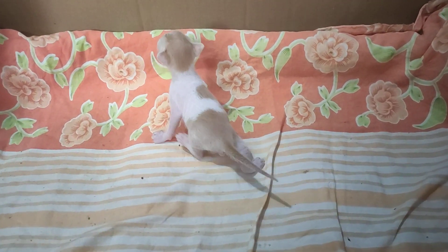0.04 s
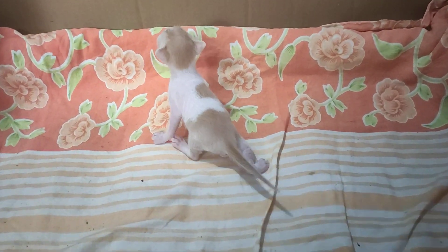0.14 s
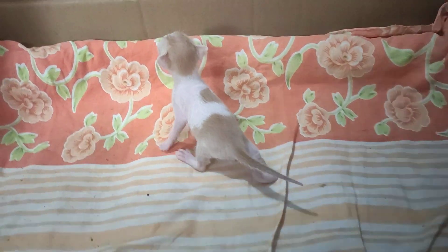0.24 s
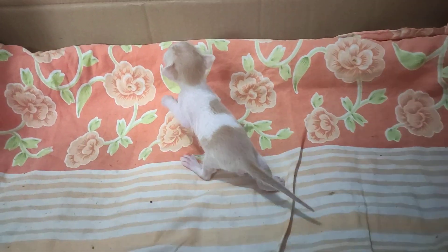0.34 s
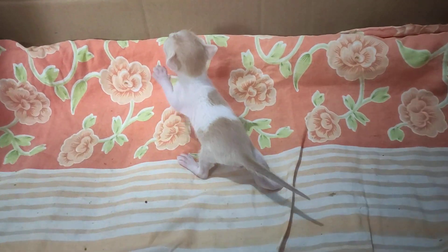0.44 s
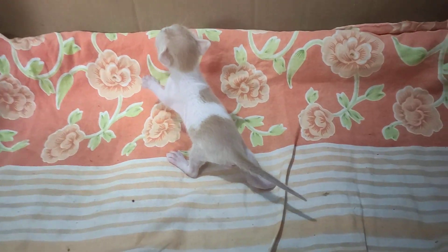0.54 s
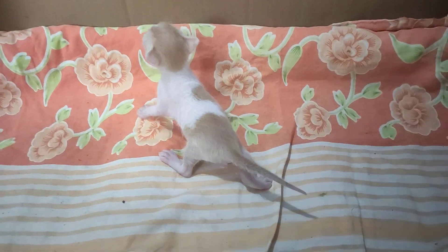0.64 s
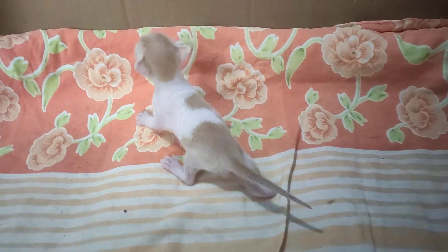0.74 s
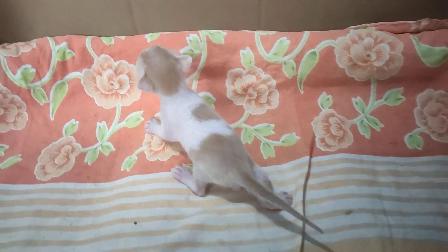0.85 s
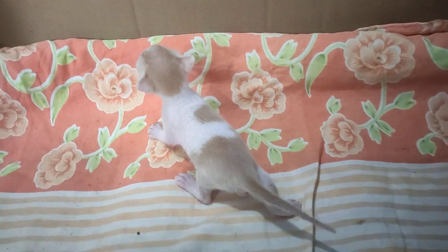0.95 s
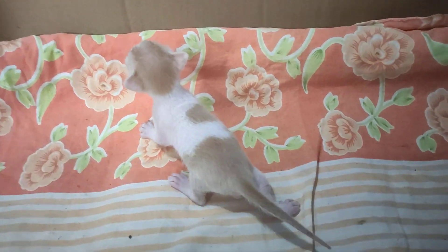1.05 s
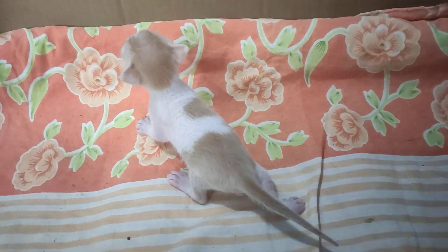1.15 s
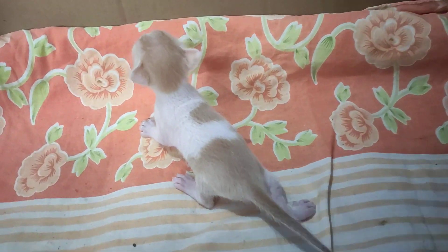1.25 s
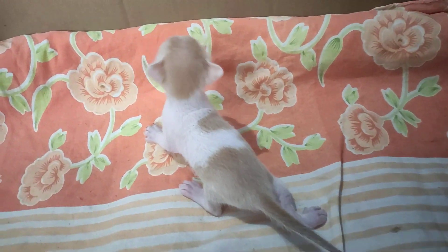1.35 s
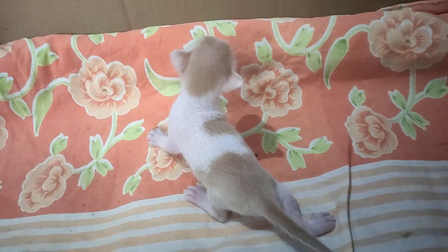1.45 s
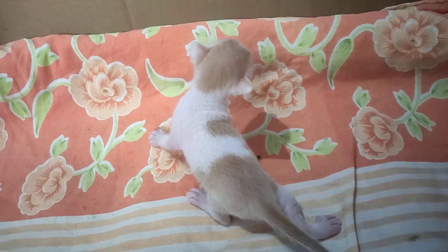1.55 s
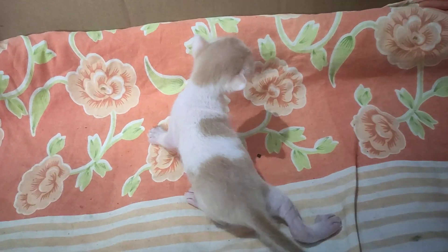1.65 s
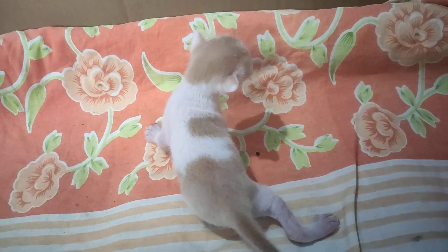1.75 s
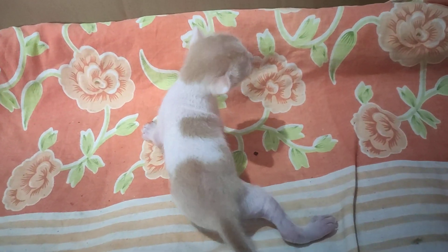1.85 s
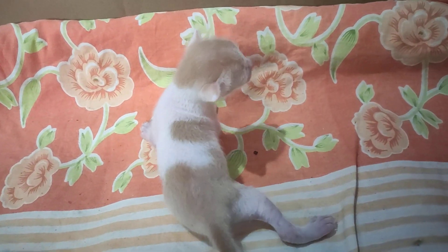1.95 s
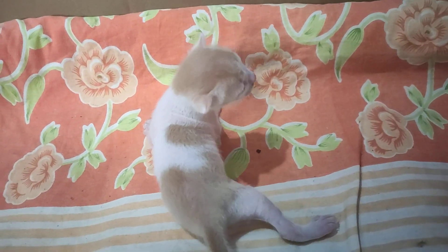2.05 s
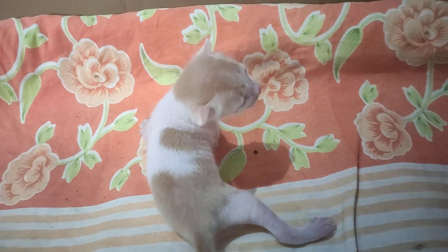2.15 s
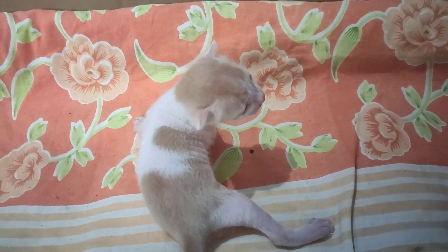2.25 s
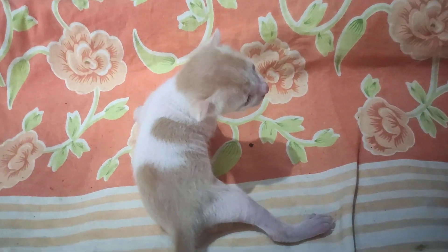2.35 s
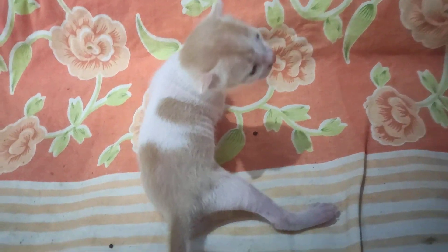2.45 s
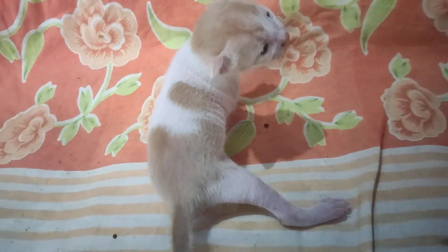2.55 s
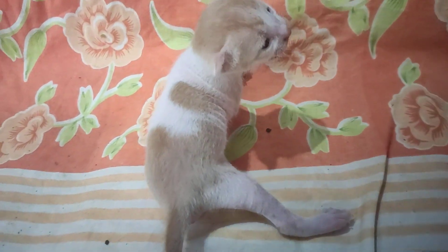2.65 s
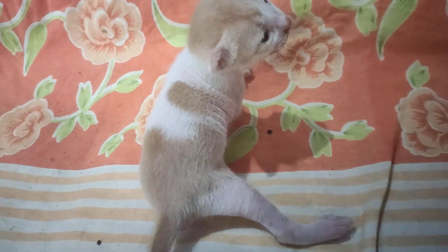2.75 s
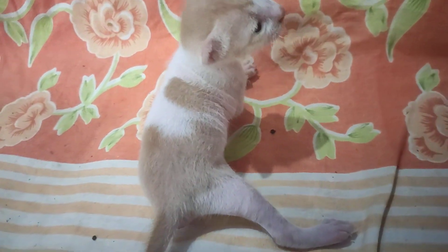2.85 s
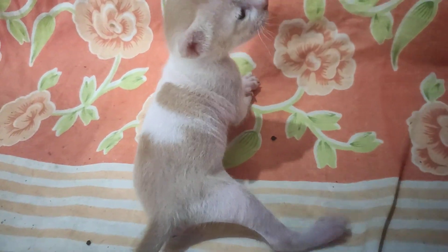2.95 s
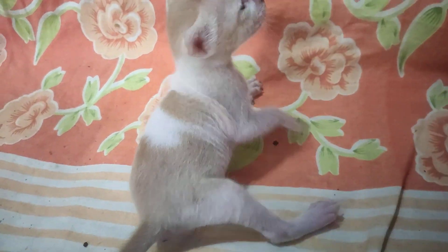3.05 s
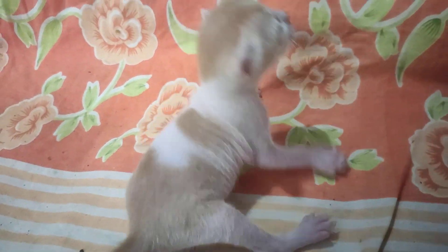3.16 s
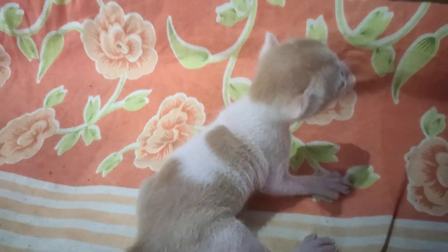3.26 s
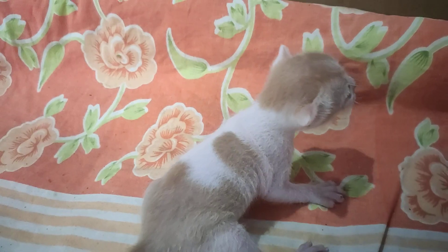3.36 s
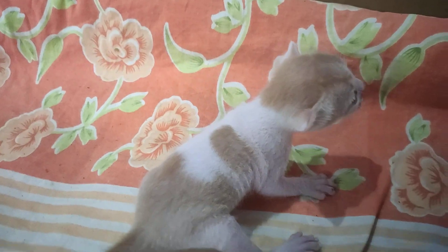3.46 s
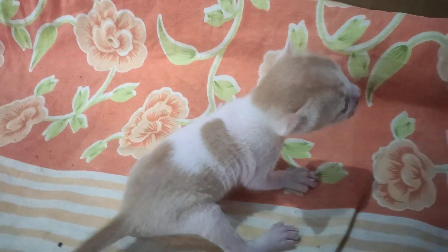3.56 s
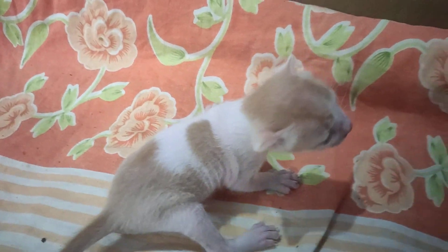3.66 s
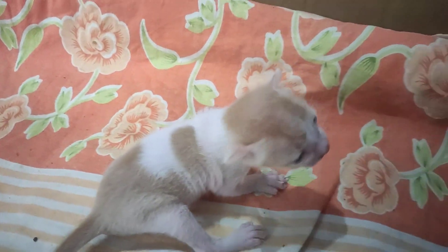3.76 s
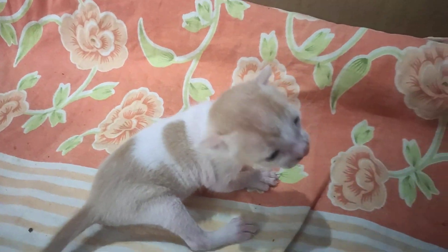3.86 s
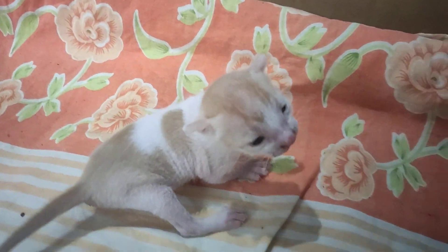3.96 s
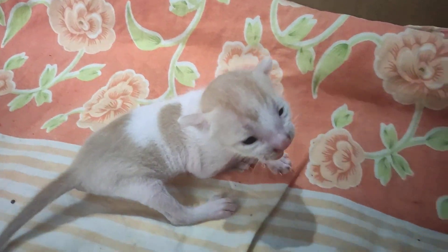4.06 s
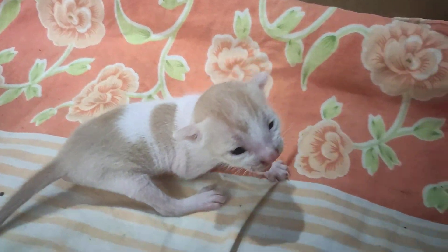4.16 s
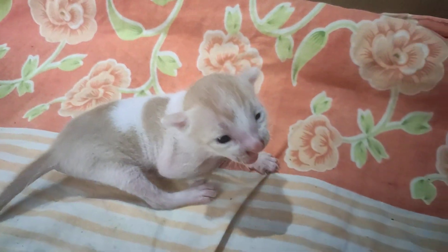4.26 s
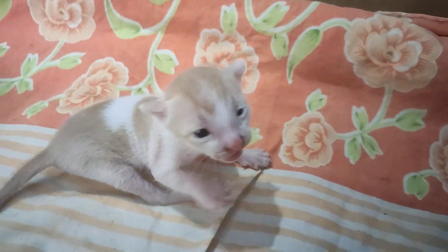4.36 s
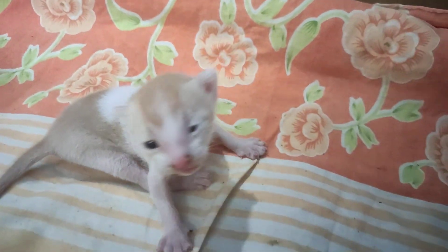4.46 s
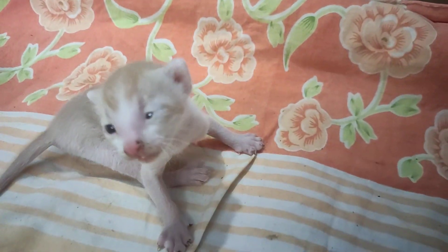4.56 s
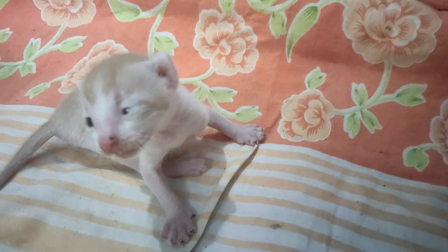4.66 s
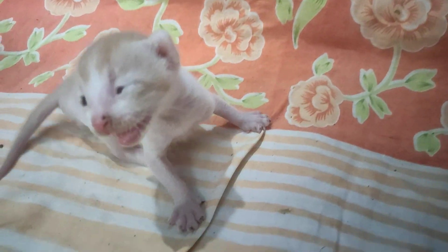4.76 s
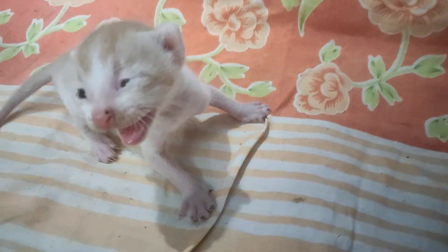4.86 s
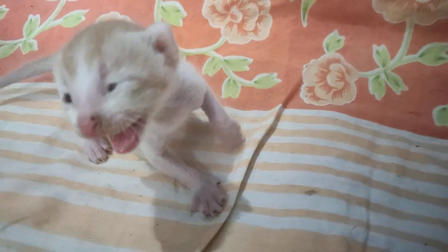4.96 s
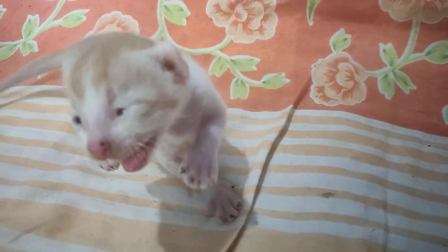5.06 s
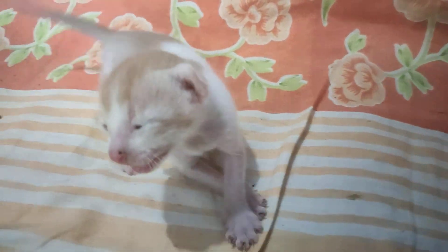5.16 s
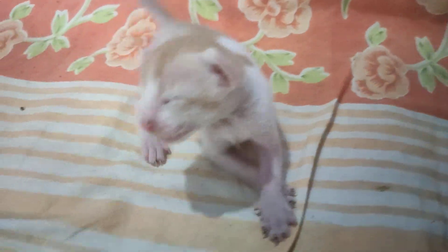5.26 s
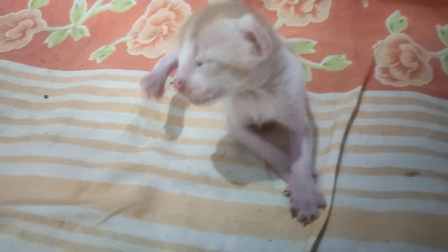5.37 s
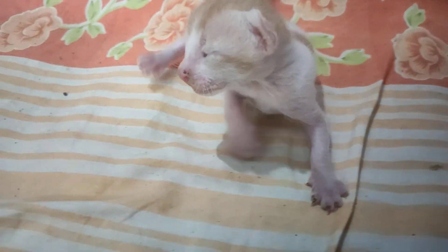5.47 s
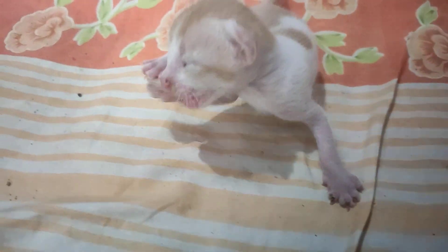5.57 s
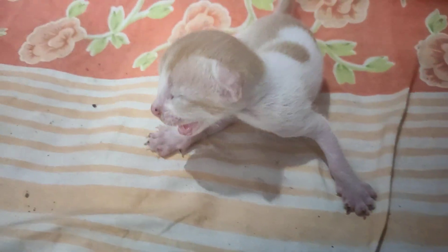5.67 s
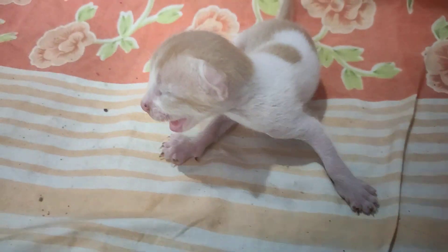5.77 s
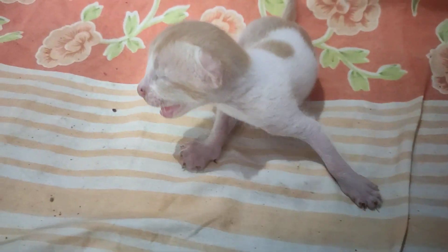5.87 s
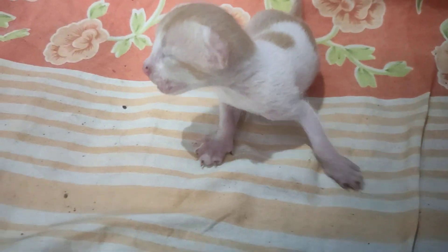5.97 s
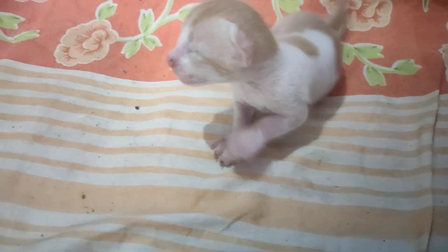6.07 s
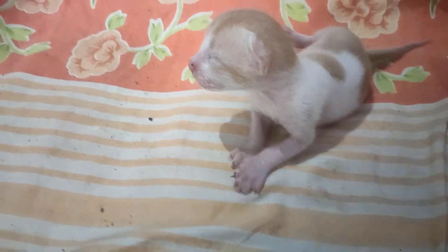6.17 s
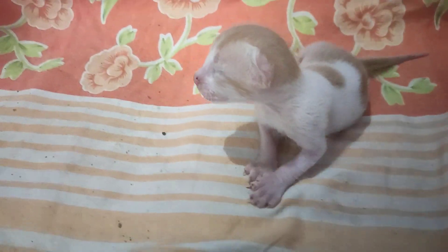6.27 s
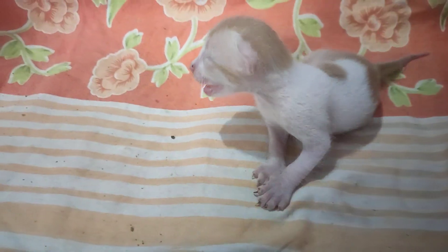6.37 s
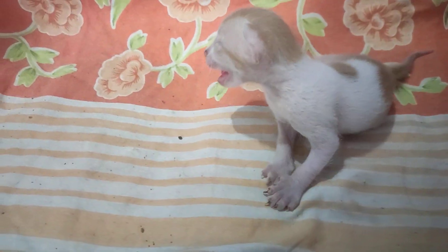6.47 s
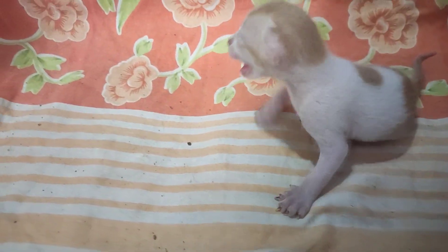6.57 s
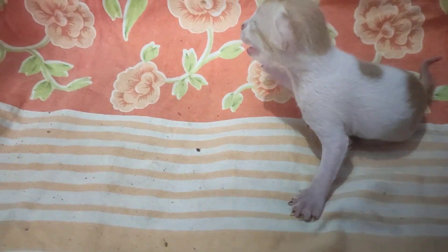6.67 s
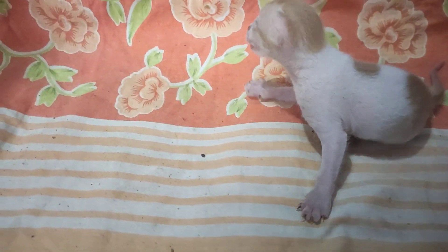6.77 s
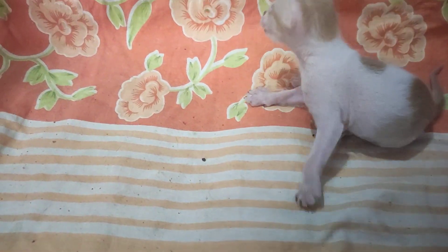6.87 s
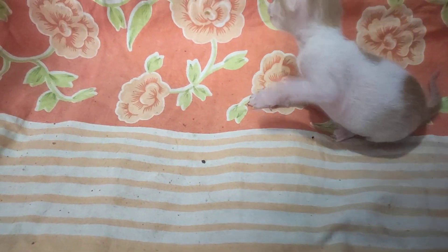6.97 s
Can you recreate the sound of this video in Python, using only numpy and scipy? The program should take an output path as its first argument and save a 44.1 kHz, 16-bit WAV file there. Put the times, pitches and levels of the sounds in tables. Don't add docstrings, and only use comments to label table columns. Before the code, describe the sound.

A very young kitten gives nine thin, loud, piercing mews, each rising quickly then sagging into breath, with tiny wet clicks before some. Beneath is a soft low fan hum and air rumble. Draught thuds on the microphone, mostly right, strong early, calmer in the middle, returning hard at the end. Close stereo pickup in a small room.

```python
import sys
import numpy as np
from scipy import signal
from scipy.fft import rfft, irfft, next_fast_len
from scipy.io import wavfile
from scipy.ndimage import uniform_filter1d, minimum_filter1d

SR = 44100
rng = np.random.default_rng(int(sys.argv[2]) if len(sys.argv) > 2 else 0)


def generate_wav(signal):
    frames = np.transpose(np.atleast_2d(signal))
    scaled = np.clip(frames, -1, 1) * 32767
    pcm = np.round(scaled).astype(np.int16)
    wavfile.write(sys.argv[1], SR, pcm)


def elevation(decibels):
    levels = np.asarray(decibels, float)
    return 10 ** (levels / 20)


N = 310023
SIDE = np.array([[1], [-1]])


def rms_one(x):
    return x / np.sqrt(np.mean(x ** 2) + 1e-20)


def at_hz(points, hz):
    points = np.array(points)
    return np.interp(np.log(hz), np.log(points[:, 0]), points[:, 1])


def drift(rate, count=N):
    r = np.exp(-80 * np.pi * rate / SR)
    slow = signal.lfilter([1], [1, -2 * r, r * r], rng.standard_normal(count // 40 + 1002))[1000:]
    filled = np.interp(np.arange(count) / 40, np.arange(len(slow)), rms_one(slow))
    return uniform_filter1d(filled, size=70)


def coloured(x, spectrum):
    size = next_fast_len(x.shape[-1])
    hz = np.maximum(np.arange(size // 2 + 1) * SR / size, 1)
    return irfft(rfft(x, size) * elevation(at_hz(spectrum, hz)), size)[..., :x.shape[-1]]


def resonate(x, hz, width_hz):
    r = np.exp(-np.pi * width_hz / SR)
    return signal.lfilter([1, 0, -1], [1, -2 * r * np.cos(2 * np.pi * hz / SR), r * r], x)


def fan():
    # (pitch_hz, level_db per Hz)
    air_colour = [(26, -42), (45, 1.5), (130, -17), (150, -12.5), (303, -6), (614, -23.5), (1220, -15.5),
                  (1690, -21.5), (2710, -23.5), (4230, -34), (12500, -46.5), (16200, -96), (22000, -120)]
    # (pitch_hz, likeness 0-1)
    likeness = np.array([(60, 0.93), (180, 0.98), (550, 0.00094), (1650, 0), (4970, 0), (15000, 0.0)])
    # (pitch_hz, width_hz, before_db, after_db)
    hums = [(127, 23, -53.5, -42), (266, 39, -58, -48.5), (774, 203, -48, -56), (1170, 97, -67.5, -51.5)]
    # (start_s, end_s)
    dip_s = (0.63, 4.65)
    hz = likeness[:, 0]
    alike = np.clip(likeness[:, 1], .01, .99)
    mid, side = coloured(rng.standard_normal((2, N)), air_colour)
    mid = coloured(mid, np.c_[hz, 10 * np.log10(1 + alike)])
    side = coloured(side, np.c_[hz, 10 * np.log10(1 - alike)])
    air = rms_one(mid + side * SIDE) * elevation(-41 + 0.6 * drift(3.5))
    for centre_hz, width_hz, before_db, after_db in hums:
        level_db = np.interp(np.arange(N) / SR, dip_s, [before_db, after_db]) + 1.1 * drift(0.35)
        air = air + elevation(level_db) * rms_one(resonate(rng.standard_normal(N), centre_hz, width_hz))
    return air


def hush(background):
    depth_db = np.zeros(N)
    for rows in cries():
        s, pitch, effort, opening = rows.T
        depth_db += np.interp(np.arange(N) / SR, s, np.clip(effort + 40, 0, 28), left=0, right=0)
    band = coloured(background, [(1900, -40), (2500, 0), (5800, 0), (7000, -40)])
    return background - band * (1 - elevation(-depth_db))


def gust_db(column):
    # (time_s, left_db, right_db)
    steady_draught = np.array([(0.0, -28, -22.5), (.55, -37, -20), (1.2, -50, -23.5), (1.5, -61, -21.5),
                               (2.3, -52, -22.5), (2.55, -41, -35.5), (4.3, -41.5, -65), (5.7, -41, -38),
                               (6.05, -59, -29.5), (6.38, -47, -22.5), (6.45, -30, -20),
                               (7.03, -26.5, -19.5)])
    # (peak_s, left_db, right_db)
    gusts = np.array([(0.071, -30, -27), (.24, -34, -28), (.47, -29, -16), (0.592, -38, -14.5),
                      (.67, -35, -26), (.88, -43, -15), (1.027, -38, -16.5), (1.39, -50, -17.5),
                      (1.681, -47, -18.5), (2.061, -40, -17.5), (2.69, -48, -43.5), (2.771, -29, -49),
                      (2.882, -50, -34), (3.08, -28, -27.5), (3.21, -37, -50), (3.36, -35.5, -45),
                      (3.61, -43, -28.5), (3.764, -22.5, -45), (3.882, -26, -24.5), (4.02, -29.5, -29.5),
                      (4.42, -39, -29.5), (4.99, -59.5, -36), (5.198, -30.5, -23), (5.32, -39, -24),
                      (5.469, -45, -29.5), (5.92, -50, -18.5), (6.502, -40, -13.5), (6.58, -21.5, -21.5),
                      (6.79, -18, -12.5), (6.95, -24, -26)])
    fade_db_per_s = 142
    t = np.arange(0, N + 64, 64) / SR
    steady = np.interp(t, steady_draught[:, 0], steady_draught[:, column])
    peaks = gusts[:, [column]] - fade_db_per_s * np.abs(t - gusts[:, :1])
    return np.interp(np.arange(N) / SR, t, np.maximum(steady, peaks.max(axis=0)))


def draught():
    swing_colour = [(8, 5.5), (30, 6.5), (70, 3.0), (300, -68.0)]
    kick_colour = [(30, -37.0), (90, 3.5), (200, -8.5), (350, -26.5), (600, -30), (1500, -110)]
    out = []
    for force_db in (gust_db(column=1), gust_db(column=2)):
        swings = coloured(rng.standard_normal(N), swing_colour)
        swings = rms_one(swings * elevation(2.0 * drift(7.76))) * elevation(force_db)
        passing = rng.random(N) < 110 / SR
        strength = elevation(3 * np.minimum(rng.exponential(1, N), 2.6))
        eddies = passing * rng.choice([-1, 1], N) * strength
        kicks = coloured(eddies * elevation(5.3 * np.tanh(drift(31.0))), kick_colour)
        kicks = rms_one(kicks) * elevation(force_db - 10.0 + .5 * (force_db + 30.5))
        out.append(swings + kicks)
    return .7 * np.tanh(np.array(out) / .7)


def knocks():
    # (time_s, peak_db, left_right_db, width_ms)
    eddies = [(0.106, -22, -18, 5.5), (0.27, -27, -19, 3.8), (0.298, -28, -22, 3.7), (0.318, -19.5, -25, 4),
              (0.391, -29, -20, 3.6), (0.45, -22, -20, 4.6), (0.471, -17.5, -27, 2.2),
              (0.491, -19, -19, 4.5), (0.517, -15.5, -27, 3), (0.573, -31, -15, 5.5),
              (0.612, -15.5, -23, 3.2), (0.644, -19, -14, 4.5), (0.702, -16.5, -25, 3.2),
              (0.748, -18.5, -24, 3.3), (0.778, -22, -22, 3.2), (0.839, -15.5, -23, 5.2),
              (0.867, -22, -24, 3.6), (0.886, -19, -22, 4), (0.951, -33, -17, 3), (0.982, -35, -25, 5.2),
              (1.024, -12, -25, 4.7), (1.072, -18.5, -18, 5.6), (1.126, -24, -20, 3.1),
              (1.384, -22, -16, 3.9), (1.465, -18, -26, 5.8), (1.5, -18, -23, 5), (1.608, -20.5, -26, 5.3),
              (1.706, -17.5, -22, 5.5), (1.797, -23, -17, 4.1), (1.864, -18, -19, 5.1),
              (2.079, -19, -22, 3.7), (2.15, -23, -16, 4.8), (2.336, -22, -24, 4.6), (3.89, -23.5, -18, 4),
              (5.896, -24, -14, 4.9), (6.331, -22.5, -24, 3.5), (6.42, -11, -23, 7.7), (6.468, -37, -21, 5),
              (6.504, -14, -30, 3.1), (6.524, -20.5, -27, 3), (6.571, -20, -15, 5.3),
              (6.605, -15.5, -26, 3.3), (6.622, -12, -17, 5.1), (6.65, -19.5, -19, 3.5),
              (6.731, -24, -19, 5), (6.77, -23, -20, 3.9), (6.806, -33, -21, 3.9), (6.858, -25, -20, 3.4)]
    out = np.zeros((2, N + 2000))
    t = np.arange(-1000, 1000) / SR
    for (s, peak_db, pan_db, width_ms), sign in zip(eddies, rng.choice([-1, 1], (len(eddies), 1))):
        u = 4000 * t / width_ms
        level_db = peak_db + 6.5 + np.minimum(pan_db * SIDE, 0)
        start = round(s * SR)
        out[:, start:start + 2000] += sign * u * np.exp(-u ** 2 / 2) * elevation(level_db)
    return out[:, 1000:N + 1000]


def rustle():
    # (start_s, length_s, level_db)
    drags = [
        (3.61, 0.47, -56.5),
        (2.05, 0.355, -74.5),
    ]
    t = np.arange(N) / SR
    swell = sum(elevation(db) * np.sin(np.pi * np.clip((t - s) / length, 0, 1)) for s, length, db in drags)
    hiss = coloured(rng.standard_normal((2, N)), [(4000, -26), (7000, -7.0), (11000, -14), (15000, -16.5)])
    return swell * rms_one(hiss)


def room(x):
    # (delay_s, left_db, right_db)
    echoes = [
        (.011, -26.5, -27.5),
        (.019, -27.5, -26),
        (.031, -27, -24),
        (.044, -22.5, -22),
    ]
    room_t60_s, room_db = 0.31, -18.5
    box_hz, box_t60_s, box_db = 4450, .36, -26
    tail_colour = [(2800, 13.0), (3700, -22.5), (4400, -7.0), (5200, -6.0), (9000, -17.5), (15000, 2.0)]
    t = np.arange(SR // 2) / SR
    tail = rng.standard_normal((2, len(t))) * elevation(-60 * t / room_t60_s) * (t > .006)
    tail = coloured(tail, tail_colour)
    tail = tail / np.sqrt(np.sum(tail ** 2, axis=1, keepdims=True))
    ring = resonate(rng.standard_normal((2, len(t))), box_hz, width_hz=1000) * elevation(-60 * t / box_t60_s)
    ring = ring / np.sqrt(np.sum(ring ** 2, axis=1, keepdims=True)) / 5
    tail = elevation(room_db) * tail + elevation(box_db + 15) * ring
    for s, *side_db in echoes:
        tail[:, round(s * SR)] += elevation(np.array(side_db))
    return signal.fftconvolve(x.mean(axis=0, keepdims=True), tail, axes=1)[:, :N]


def ticks():
    # (start_s, peak_db, centre_hz, length_ms)
    small_sounds = [(.074, -37, 3300, 8.3), (1.629, -33, 3350, 3), (2.417, -26.5, 3260, 1.1),
                    (3.214, -34, 3550, 6.4), (3.914, -40, 10450, 6.5), (3.93, -39, 8570, 6),
                    (3.969, -26.5, 3270, 1.2), (4.49, -55, 13250, 2.4), (4.591, -39, 11400, 1.7),
                    (4.792, -29, 3270, 2.8), (4.793, -37.5, 12000, 2.54), (4.794, -39, 8700, 2.5),
                    (5.585, -34.5, 3500, 6.5), (6.39, -38, 3650, 2.9)]
    out = np.zeros((2, N))
    t = np.arange(600) / SR
    for s, peak_db, hz, length_ms in small_sounds:
        burst = rng.standard_normal((2, 600)) * t * np.exp(-2000 * t / length_ms)
        tick = resonate(resonate(burst, hz, .2 * hz), hz, .2 * hz)
        start = round(s * SR)
        out[:, start:start + 600] += elevation(peak_db) * tick / np.abs(tick).max()
    return out


def cries():
    # (time_s, pitch_hz, effort_db, mouth_opening 0-1)
    cry_1 = [(0.098, 993, -29, 0.58), (0.128, 1090, -19.5, 0.62), (0.152, 1127, -18, 0.65),
             (0.228, 1202, -14, 0.72), (0.29, 1192, -15.5, 0.61), (0.39, 1120, -17.5, 0.58),
             (0.429, 1063, -22, 0.7), (0.491, 835, -29, 0.23), (0.52, 745, -39, 0.1)]
    cry_2 = [(0.872, 1018, -39, 0.47), (0.893, 1042, -22, 0.75), (0.931, 1127, -19.5, 0.67),
             (0.986, 1204, -17, 0.72), (1.036, 1226, -7, 0.72), (1.118, 1157, -13.5, 0.38),
             (1.185, 1065, -19, 0.59), (1.225, 932, -22, 0.44), (1.279, 772, -33.5, 0.2)]
    cry_3 = [(1.65, 1015, -33, 0.45), (1.678, 1023, -22.5, 0.59), (1.726, 1126, -14.5, 0.77),
             (1.79, 1169, -14.5, 0.85), (1.849, 1147, -15, 0.73), (1.898, 1100, -19, 0.63),
             (1.934, 1022, -14, 0.69), (2.003, 765, -31, 0.21), (2.023, 706, -41, 0.19)]
    cry_4 = [(2.424, 1048, -40.5, 0.31), (2.455, 1002, -23.5, 0.55), (2.496, 1100, -16.5, 0.6),
             (2.553, 1170, -11.5, 0.74), (2.637, 1170, -10, 0.7), (2.735, 1067, -18.5, 0.46),
             (2.79, 889, -20.5, 0.62), (2.816, 768, -26.5, 0.2), (2.842, 712, -38.5, 0.15)]
    cry_5 = [(3.23, 1087, -41.5, 0.31), (3.29, 1071, -24.5, 0.5), (3.339, 1143, -16, 0.71),
             (3.384, 1154, -13, 0.76), (3.429, 1174, -15, 0.69), (3.458, 1152, -14, 0.67),
             (3.498, 1100, -15.5, 0.64), (3.538, 956, -20, 0.5), (3.596, 716, -31, 0.16)]
    cry_6 = [(3.975, 1147, -38.5, 0.31), (4.01, 1052, -20.5, 0.6), (4.055, 1146, -14.5, 0.59),
             (4.121, 1203, -9.5, 0.73), (4.212, 1180, -12, 0.59), (4.3, 1069, -19, 0.59),
             (4.336, 976, -20, 0.56), (4.369, 794, -26, 0.32), (4.399, 736, -41.5, 0.19)]
    cry_7 = [(4.802, 1089, -35.5, 0.33), (4.868, 1067, -19.5, 0.43), (4.907, 1110, -16, 0.52),
             (4.974, 1136, -13, 0.6), (4.998, 1101, -12.5, 0.55), (5.04, 1083, -14, 0.37),
             (5.103, 964, -17, 0.47), (5.128, 880, -16.5, 0.47), (5.185, 681, -33, 0.014)]
    cry_8 = [(5.592, 1075, -40.5, 0.29), (5.64, 1044, -27.5, 0.28), (5.69, 1114, -22, 0.54),
             (5.735, 1148, -20.5, 0.68), (5.8, 1117, -19, 0.61), (5.83, 1089, -21, 0.47),
             (5.879, 989, -20, 0.41), (5.935, 823, -31, 0.26), (5.967, 719, -43.5, 0.2)]
    cry_9 = [(6.4, 1081, -45.5, 0.54), (6.43, 1053, -25, 0.68), (6.475, 1120, -21.5, 0.74),
             (6.522, 1155, -20.5, 0.75), (6.57, 1133, -20.5, 0.71), (6.627, 1110, -16, 0.75),
             (6.664, 1026, -26.5, 0.56), (6.701, 904, -23.5, 0.44), (6.736, 743, -34.5, 0.22)]
    # time s, pitch Hz, effort dB, opening
    swell = [-.016, 50.5, -14.5, 0]
    fade = [.045, -60, -30, 0]
    curves = [cry_1, cry_2, cry_3, cry_4, cry_5, cry_6, cry_7, cry_8, cry_9]
    return [np.vstack([np.add(rows[0], swell), rows, np.add(rows[-1], fade)]) for rows in curves]


def glide(t, s, hz):
    i = np.clip(np.searchsorted(s, t) - 1, 0, len(s) - 2)
    step, slope = s[i + 1] - s[i], np.gradient(hz, s)
    u = (t - s[i]) / step
    rise = hz[i + 1] - hz[i]
    bend = u * (1 - u) * ((1 - u) * (slope[i] * step - rise) + u * (rise - slope[i + 1] * step))
    return hz[i] + u * rise + 0.725 * np.maximum(bend, 0)


def mouth_db(hz, opening):
    shut_hz, open_hz, width_hz = 2065, 5010, 1045
    centre_hz = shut_hz + (open_hz - shut_hz) * opening
    return -20 * np.log10(1 + (2 * (hz - centre_hz) / width_hz) ** 2)


def low_overtones(t, s, pitch, effort, opening, head, pan3, pan4):
    lag_ms, first_db, *second_db, breath_db = head
    second, third, fourth = [mouth_db(k * pitch, opening) for k in range(2, 5)]
    source = effort - 10 * np.log10(elevation(third) ** 2 + elevation(fourth) ** 2)
    second = source + second + np.interp(t, s[[1, -2]], second_db)
    return [first_db + 0.53 * (effort - effort.max()) + 0 * SIDE,
            second + SIDE * pan3 * 1.06,
            source + third + SIDE * pan3 / 2,
            source + fourth + SIDE * pan4 / 2]


def high_overtones(t, s, pitch, effort, high, slack, leak, aims_db, flutter_db, pan4):
    # (pitch_hz, level_db)
    mouth_colour = [(3500, -12.5), (6000, -2), (7000, -8), (8200, -8.5), (9500, -11), (11000, -10),
                    (13000, -11), (16000, -27.5)]
    aim_hz = [5530, 7050, 7940, 8900, 11200]
    faint_db, faint_loss = -20.5, 0.26
    tight_high_db = -3.5
    hoarse_db, leak_damps_db = 2.2, -3
    shares = [np.interp(t, s[[2, 5, -3]], share) for share in np.eye(3)]
    wall_s = rng.uniform(0.000502, 0.0012, (2, 1))
    levels = []
    for k in range(5, 16):
        comb_db = 2.5 * np.cos(2 * np.pi * k * pitch * wall_s)
        colour = at_hz(mouth_colour, k * pitch) - faint_loss * np.maximum(faint_db - effort, 0)
        for share, db in zip(shares, aims_db):
            colour = colour + share * at_hz(np.c_[aim_hz, db], k * pitch)
        colour = colour + 0.61 * k * (np.tanh(drift(18.0, count=len(t))) - 0.5) - slack * (0.97 + 3.6 * k)
        colour = colour + hoarse_db * flutter_db * np.sqrt(k / 4) * np.tanh(drift(160, count=len(t)))
        colour = colour + leak_damps_db * leak * k / 8
        levels.append(high + tight_high_db * (1 - leak) + colour + comb_db + SIDE * pan4 * 0.11)
    return levels


def flutter(levels, slack, leak, flutter_db, rasp_db):
    count = len(slack)
    for k in (1, 2, 3):
        shake = (.8 + slack) * flutter_db * drift(80, count=count)
        sway = .3 * flutter_db * SIDE * drift(30, count=count)
        rasp = rasp_db * ((k - 1) / 2) ** 2 * leak * drift(200, count=count)
        levels[k] = levels[k] + shake + sway + rasp - 12.0 * slack


def sing(levels, phase, slack, leak, flutter_db):
    offsets = rng.uniform(0, 2 * np.pi, (17, 2, 1))
    apart = rng.uniform(1.0, 2.1, (17, 1)) * rng.choice([-1, 1], (17, 1))
    offsets[:, 1] = offsets[:, 0] + apart * (np.arange(17) > 4)[:, None]
    voice = 0
    for k, db in enumerate(levels, 1):
        jitter_rad = .042 * flutter_db * max(k - 2.5, 0) * leak + .3 * slack * (k > 1)
        blur = jitter_rad * drift(150, count=len(slack))
        ports = phase if k < 5 else phase[:1]
        voice = voice + np.sqrt(2) * elevation(db) * np.sin(k * ports + offsets[k] + blur)
    return voice


def breathe(phase, effort, high, slack, leak, breath_db, throat_db):
    # (pitch_hz, level_db per Hz)
    breath_colour = [(3200, -41), (3700, -7), (4500, -11.5), (5300, -31.5), (6500, -17.5), (8000, -16.5),
                     (11000, -21.5), (16000, -25.5)]
    tight_db, patchy_db, slack_throat_db, dull_db = -11, 1.2, -6, -9
    count = len(slack)
    noise = 0.17 * rng.standard_normal(count) + rng.standard_normal((2, count))
    puffs = noise * (1 + 0.89 * np.sin(phase))
    level_db = breath_db + 0.096 * effort + 0.41 * high + 3.2 * slack * leak
    level_db = level_db + tight_db * (2.0 - leak) + patchy_db * drift(23.6, count=count)
    breath = rms_one(coloured(puffs, breath_colour)) * elevation(level_db)
    top = coloured(breath, [(4800, -40), (5600, 0)])
    throat = (breath - top) * elevation(throat_db + (slack_throat_db - throat_db) * np.minimum(slack, 1))
    return throat + top * elevation(dull_db * slack)


def cry(rows, head, balance, start_aim, mid_aim, end_aim, flutter_db, leak_s, throat):
    s, *columns = rows.T
    lag_ms, breath_db = head[0], head[-1]
    throat_db, rasp_db = throat
    t = np.arange(round(s[0] * SR), round(s[-1] * SR)) / SR
    effort, opening = [uniform_filter1d(np.interp(t, s, c), size=441, mode="nearest") for c in columns[1:]]
    pitch = glide(t, s, columns[0]) * (1 + 0.0014 * drift(50.3, count=len(t)))
    pan3, pan4 = [np.interp(t, s[[1, -2]], p) for p in (balance[:2], balance[2:])]
    phase = 2 * np.pi * (np.cumsum(pitch) / SR - (SIDE + 1) / 2 * lag_ms / 1000 * pitch)
    slack = np.clip((1040 - pitch) / 250, 0, 1.5)
    leak = np.clip((t - s[0] - leak_s) / .025, 0, 1)
    high = -26.5 + 0.62 * (effort + 15) + 15.5 * slack - np.maximum(-50.0 - effort, 0)
    levels = low_overtones(t, s, pitch, effort, opening, head, pan3, pan4)
    aims_db = (start_aim, mid_aim, end_aim)
    levels += high_overtones(t, s, pitch, effort, high, slack, leak, aims_db, flutter_db, pan4)
    flutter(levels, slack, leak, flutter_db, rasp_db)
    voice = sing(levels, phase, slack, leak, flutter_db)
    breath = breathe(phase, effort, high, slack, leak, breath_db, throat_db)
    edge = np.minimum(1, np.minimum(t - t[0], t[-1] - t) / 0.0021)
    return round(s[0] * SR), (voice + breath) * edge


def kitten():
    # (left_lag_ms, fundamental_db, 2nd overtone start_db, end_db, breath_db)
    heads = [(0.12, -42.5, 2.5, 5.5, -14), (0.1388, -40.5, 7.5, 0, -15), (0.056, -37, 3, 5.5, -15.5),
             (0.0231, -41, 4.5, 8, -15), (.18, -35, 3, 4.5, -15), (0.067, -36, -5.5, 2.5, -11),
             (0.23, -43, -11, 13, -15.5), (0.19, -35.5, 6, 11, -14), (0.075, -39.5, 4.5, 3.5, -14)]
    # (3rd overtone start_db, end_db, 4th
    # overtone start_db, end_db)
    balances = [(-2, -1, -4.5, -10.5), (4, -1, -1.5, -8.5), (-1, -1.5, 10, -0.5), (0, -2.5, 10.5, 2),
                (-10, 9, 11.5, 6.5), (-7, 6, 11.5, -5), (-14, 1.5, 14.5, -10), (0, -2.5, 5, -5),
                (-7, -0.5, 9.5, 5)]
    start_aims = [(-6, -4, 8.8, 6, -12), (-2, -4, 19, 4.5, -5), (0, -8, 14.7, -2, -15),
                  (1, -14, 13.6, 1.5, -6), (4, -5, 1, -1.5, -4.5), (-0.5, 0, 8.1, 3, -3.5),
                  (3.5, -7, 0.85, -4, -2), (9, -3, 4.3, 3, 0), (5.5, -13, 7, 6.5, -10)]
    mid_aims = [(-11, -8, 1.2, 2.5, -5), (-13, -2, 3.7, 2.5, -9), (-5.5, 11.5, 3, 2, -9.5),
                (-12, 8.5, 12, 7.5, -2), (-15, -6.5, 9.1, -7, -3), (-4, 6, 2.1, 0, 6), (-4, -4, 2, 3.5, -6),
                (3.5, 7, 2.7, -3, 0.5), (-2, -2, 4.1, 0, -4.5)]
    end_aims = [(-5, 5, 3.8, 4, -15), (-5, 4, 2.4, -6, -7), (-5, -1, 11, -19, -15), (4, 6, 4.5, -9, -1.5),
                (0, 3, 6.5, -3, -15.5), (1.5, 6, 2.7, -5, -6), (-5, 4, 3.3, -10, -5), (6, 7, 2, -6, -2),
                (-13, 8.5, 5.6, -7, -3)]
    flutters = [1.5, .9, .9, .7, 1.4, .9, 1.5, 1.5, 1.5]
    leaks = [.03, .05, .08, .055, .11, .045, .1, .07, .07]
    # (throat_db below 5 kHz against the rest, rasp_db of the 3rd and 4th overtones)
    throats = [(-12, 2.4), (-11, 1.3), (-7, .8), (-4, .5), (-4, 1), (-4, .6), (-1, 1), (-4, .9), (-10, .7)]
    out = ticks()
    poses = zip(cries(), heads, balances, start_aims, mid_aims, end_aims, flutters, leaks, throats)
    for pose in poses:
        start, sound = cry(*pose)
        out[:, start:start + sound.shape[1]] += sound
    return out


def scene():
    voice = kitten()
    return voice + room(voice) + hush(fan()) + draught() + rustle() + knocks()


def low_pass(x):
    return signal.sosfilt(signal.butter(12, 15740, fs=SR, output="sos"), x)


def record(dry):
    room_left = np.minimum(1, .93 / (np.abs(dry).max(axis=0) + 1e-9))
    gain = uniform_filter1d(minimum_filter1d(room_left, size=883), size=441)
    return low_pass(dry * gain)


dry = scene()
out = record(dry)
generate_wav(out)
```